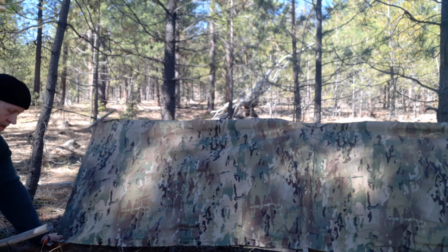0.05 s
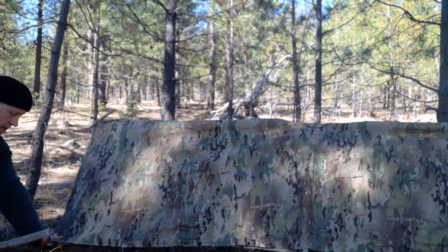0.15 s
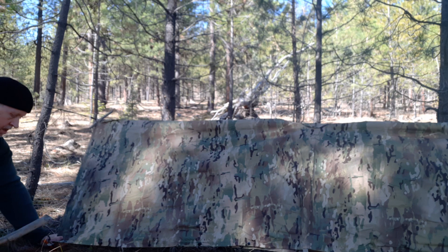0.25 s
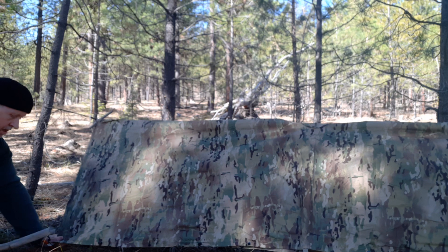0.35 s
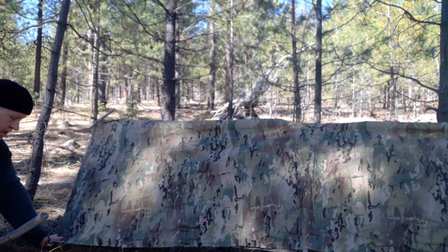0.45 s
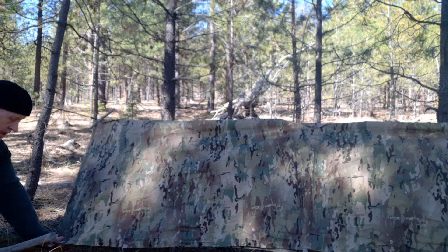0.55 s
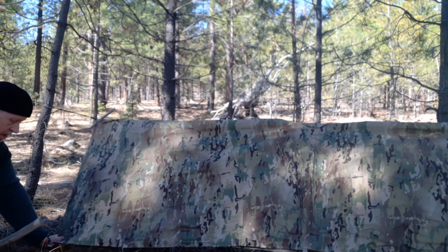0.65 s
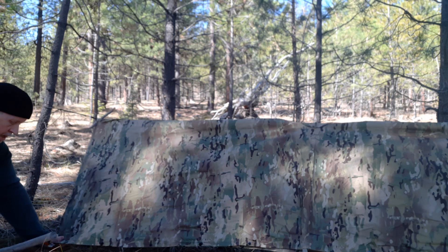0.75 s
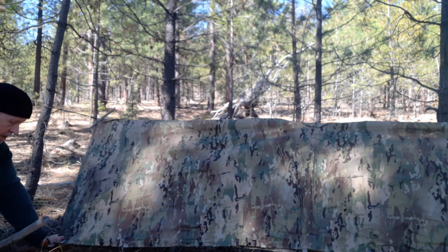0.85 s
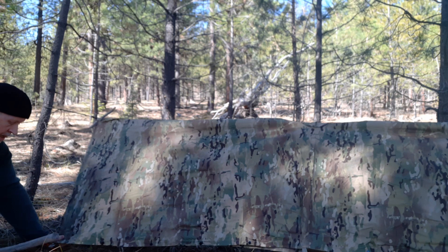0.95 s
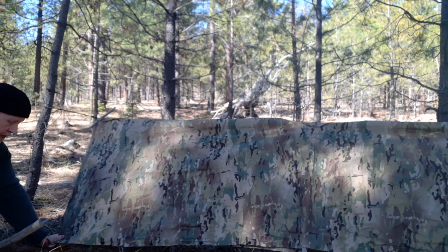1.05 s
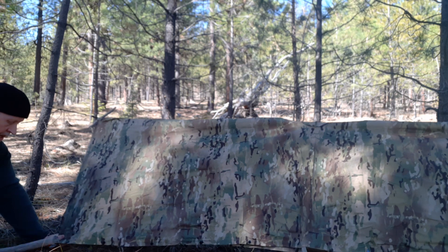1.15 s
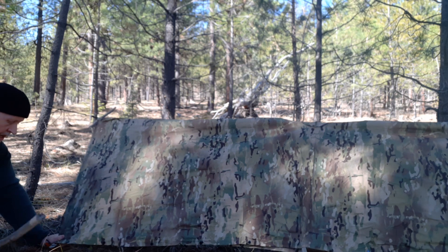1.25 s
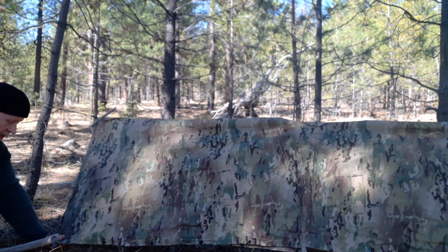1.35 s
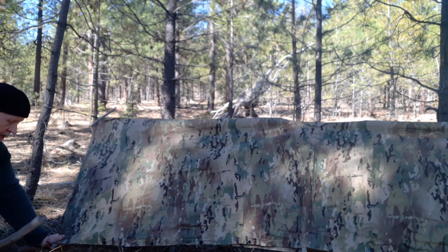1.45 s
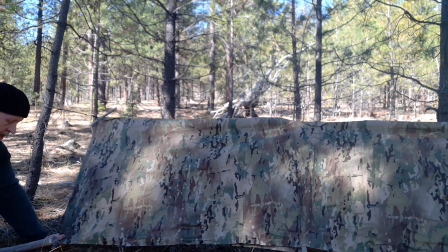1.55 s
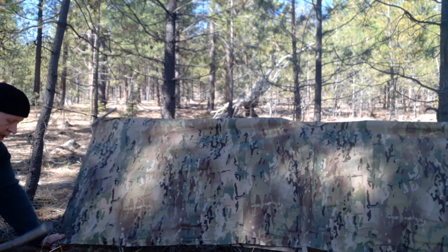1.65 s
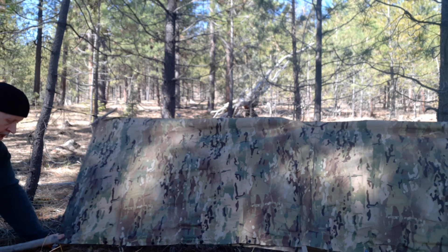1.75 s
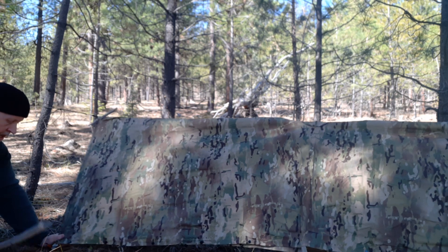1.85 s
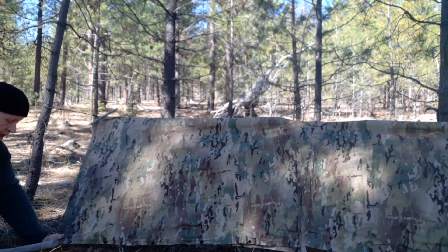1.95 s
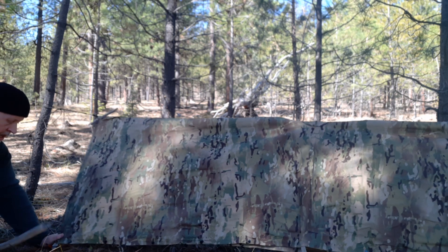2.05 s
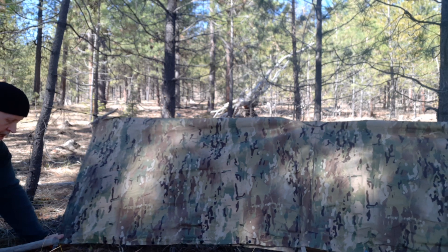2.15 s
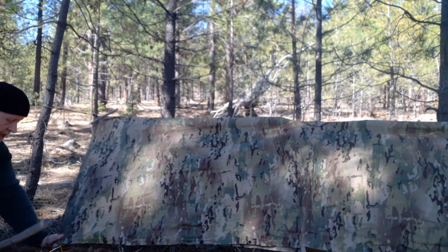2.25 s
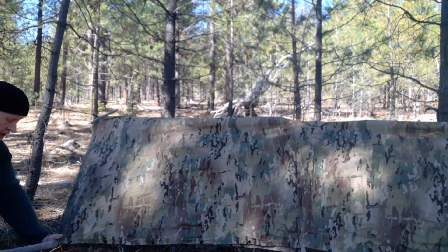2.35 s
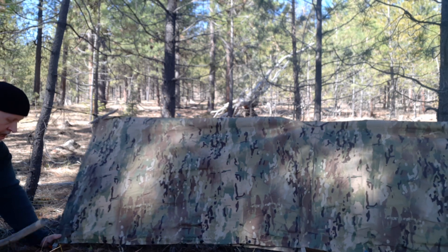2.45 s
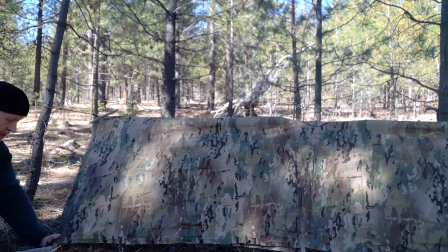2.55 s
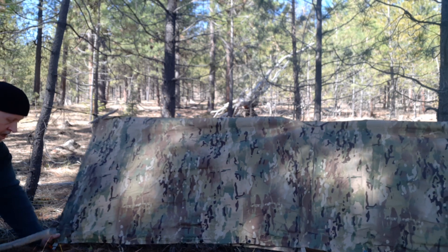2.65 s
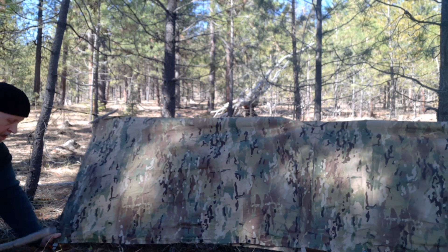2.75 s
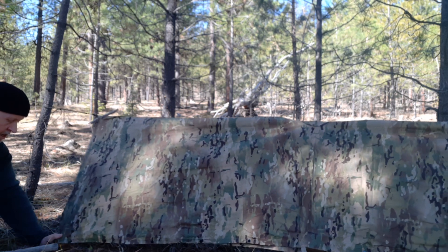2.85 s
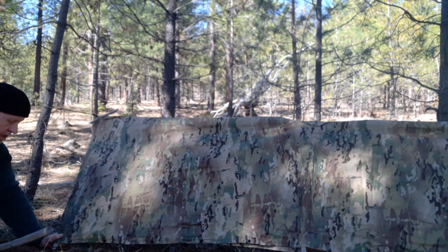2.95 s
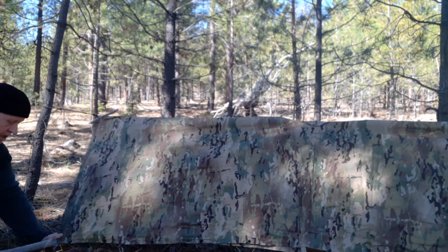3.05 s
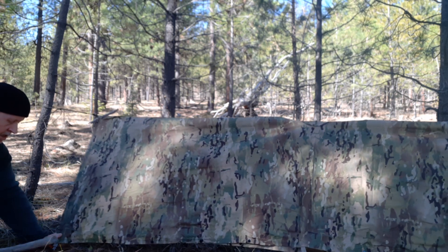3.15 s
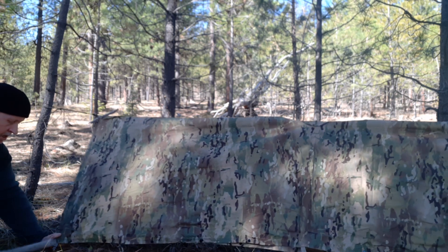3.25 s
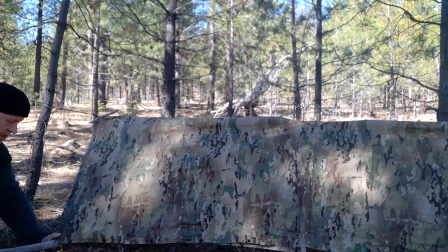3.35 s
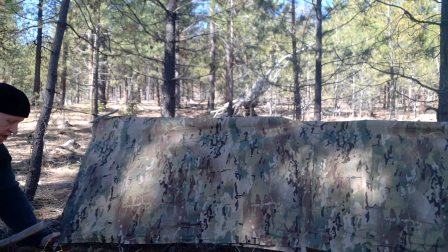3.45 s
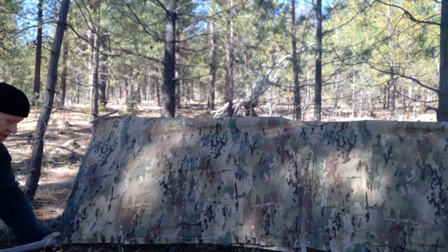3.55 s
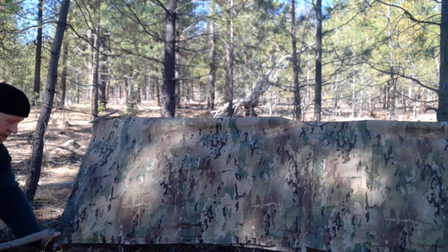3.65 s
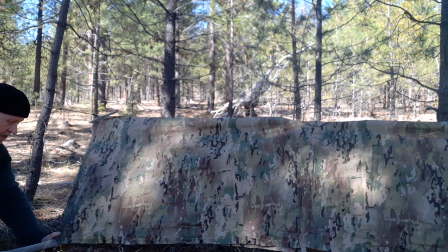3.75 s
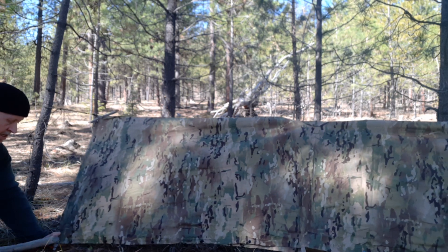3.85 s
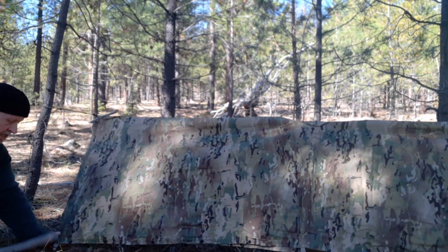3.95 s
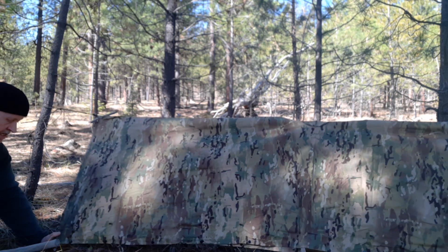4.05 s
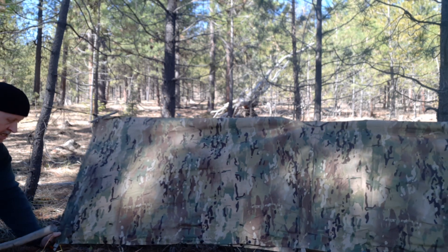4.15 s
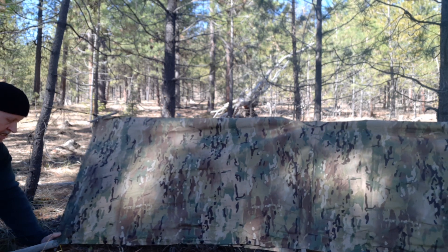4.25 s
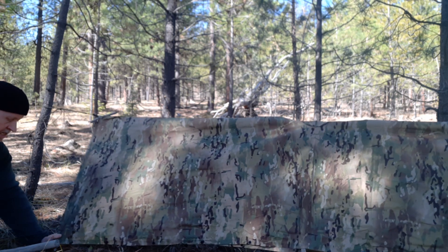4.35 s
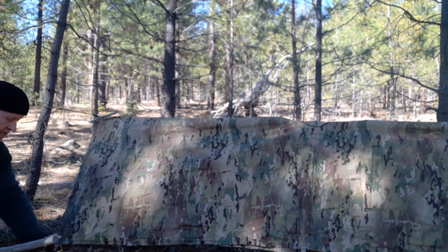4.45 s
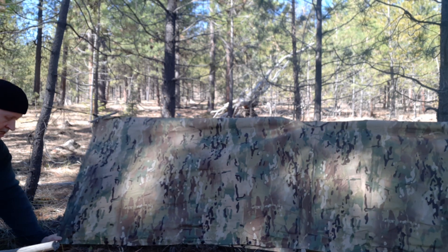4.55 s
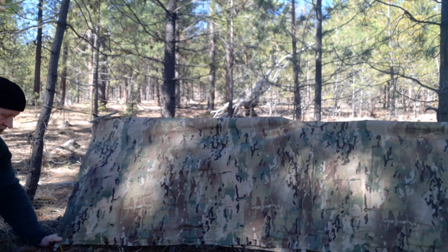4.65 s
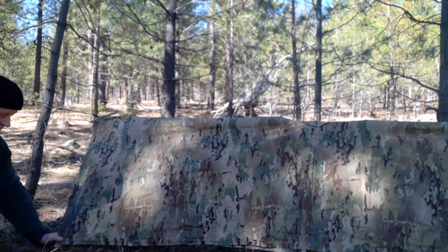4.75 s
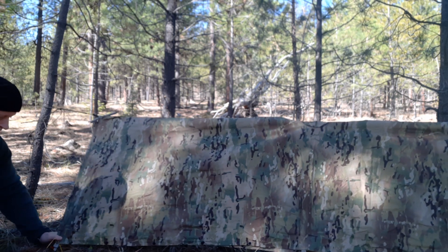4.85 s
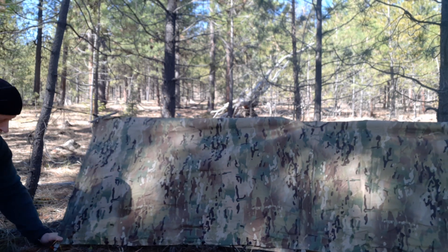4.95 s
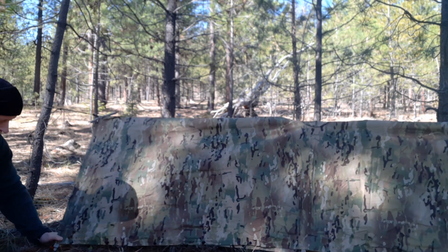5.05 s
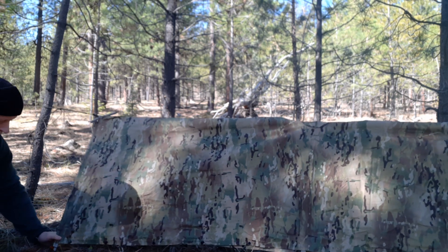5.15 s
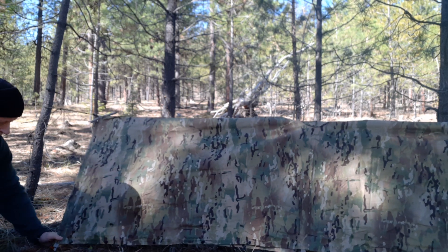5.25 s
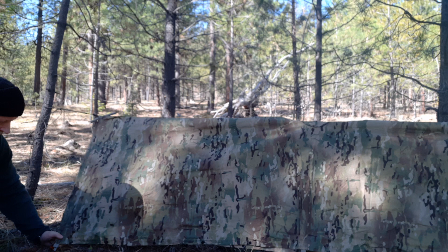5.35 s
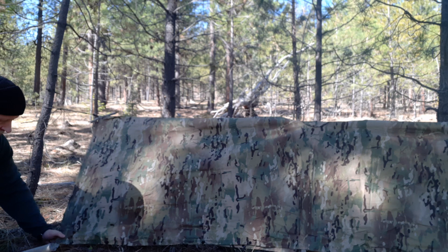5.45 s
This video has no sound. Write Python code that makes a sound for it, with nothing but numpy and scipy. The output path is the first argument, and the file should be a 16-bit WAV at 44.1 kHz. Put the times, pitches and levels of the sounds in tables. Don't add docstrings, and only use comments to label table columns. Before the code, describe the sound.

A wooden club raps a stake about five times a second, falters, resumes slower, then stops, leaving wind rumble and rustling cloth.

```python
import sys
import numpy as np
from scipy import signal
from scipy.fft import rfft, irfft, next_fast_len
from scipy.io import wavfile
from scipy.ndimage import uniform_filter1d, map_coordinates

SR = 44100
rng = np.random.default_rng(int(sys.argv[2]) if len(sys.argv) > 2 else 0)


def wav_out(sig):
    wavfile.write(sys.argv[1], SR, np.round(np.clip(np.atleast_2d(sig).T, -1, 1) * 32767).astype(np.int16))


def gain_from_decibels(decibels):
    exponent = np.asarray(decibels, float) / 20
    return 10 ** exponent


N = 242991


def unit(x):
    return x / np.sqrt(np.mean(x ** 2) + 1e-20)


def along(points, hz):
    f, v = np.transpose(points)
    return np.interp(np.log(hz + 1), np.log(f + 1), v)


def wobble(rate):
    knots = rng.standard_normal(int(N * rate / SR) + 4)
    return map_coordinates(knots, [np.arange(N) * rate / SR])


def filtered(x, response):
    n = x.shape[-1]
    m = next_fast_len(n + 2048)
    return irfft(rfft(x, m) * response(np.fft.rfftfreq(m, 1 / SR)), m)[..., :n]


def nearness(hz, center, width):
    return 1 / (1 + (2 * (hz - center) / width) ** 2)


def ring(x, modes, detune=1):
    c, w, db = np.transpose(modes)[:, :, None]
    each = filtered(x, lambda f: 1j * f * w / ((c * detune) ** 2 - f * f + 1j * f * w))
    signs = (-1) ** np.arange(len(modes))[:, None]
    each *= gain_from_decibels(db) * signs / np.linalg.norm(each, axis=1, keepdims=True)
    total = each.sum(axis=0)
    return total / np.abs(total).max()


def rush(spectrum, patchy_db):
    z = signal.stft(rng.standard_normal((2, N)), nperseg=512)[2]
    field = uniform_filter1d(rng.standard_normal(z.shape[1:]), size=8, axis=0)
    field = uniform_filter1d(field, size=6, axis=1)
    pair = signal.istft(z * gain_from_decibels(patchy_db * unit(field)), nperseg=512)[1][:, :N]
    return unit(filtered(pair, lambda hz: gain_from_decibels(along(spectrum, hz))))


def ports(x, lag_s, alike):
    # (frequency [Hz], level [dB])
    shade = [(60, -1), (200, -3.5), (600, -1.5), (1600, -5.5), (3000, -6.5), (6000, -5.5), (9000, -8.5),
             (15000, -11)]

    def to_left(hz):
        late = np.exp(-2j * np.pi * hz * lag_s)
        echo = 0.077 * np.exp(-2j * np.pi * hz * 0.0006)
        return gain_from_decibels(along(shade, hz) / 2) * late * (alike + echo)

    left = filtered(x, to_left)
    right = filtered(x, lambda hz: gain_from_decibels(-along(shade, hz) / 2))
    return np.array([left, right])


def crack(s, square_db, flex_db, shove_db):
    # (frequency [Hz], width [Hz], level [dB])
    wood = [(670, 180, -3), (907, 630, 0.5), (1350, 300, -0.5), (1564, 190, 0.5), (2017, 140, 1)]
    # (frequency [Hz], width [Hz], level [dB])
    face = [(5290, 710, -2), (6672, 430, -0.5), (7445, 510, -3.5)]
    # (frequency [Hz], width [Hz], level [dB])
    edge = [(2840, 1100, -6.5), (3514, 320, -6), (3814, 850, -6)]
    # (frequency [Hz], width [Hz], level [dB])
    splinter = [(9850, 5000, -4.5), (11630, 980, -2), (12500, 1300, -14)]
    t = np.arange(SR // 12) / SR
    chatter_s = 0.0088
    force = rng.standard_normal((4, len(t))) * gain_from_decibels(4.26 * rng.standard_normal(len(t)))
    force *= (1 - np.exp(-t / 0.00035)) * gain_from_decibels(-60 * t / chatter_s)
    force[:, 6] += [1.3, 5.06, 1.6, 4.1]
    detune = 1 + 0.008 * rng.standard_normal()

    low_hz, low_width, low_db = wood[0]
    low_db = low_db + 0.5 * (s - 2.5)
    bending = [(low_hz, low_width, low_db)] + wood[1:]
    wood_db = 4.5 + flex_db - 1.89 * s
    edge_db = 9 + 0.6 * flex_db - 2.5 * s
    spit_db = 2 + 0.48 * square_db - 0.6 * shove_db - 1.93 * s
    out = gain_from_decibels(4.5 + square_db) * ring(force[0], face, detune)
    out += gain_from_decibels(wood_db) * ring(force[1], bending, detune)
    out += gain_from_decibels(edge_db) * ring(force[2], edge, detune)
    out += gain_from_decibels(spit_db) * ring(force[3], splinter)
    bounce = round(0.0042 * SR)
    out[bounce:] += gain_from_decibels(-14) * out[:-bounce]
    return out


def thump(s, shove_db):
    # (frequency [Hz], width [Hz], level [dB])
    soil = [(100, 18, -1), (150.2, 41, 1.5), (273.3, 58, -3.5)]
    t = np.arange(SR // 12) / SR
    shove = t * np.exp(-t / 0.0015)
    high_hz, high_width, high_db = soil[2]
    packed = (high_hz, high_width, high_db + 1.5 * (s - 2.5))
    return gain_from_decibels(-16 + shove_db) * ring(shove, soil[:2] + [packed], 1 + 0.056 * rng.standard_normal())


def trunks(n, tilt_db, loose):
    # (frequency [Hz], time to fall 60 dB [s])
    fading = [(150, 0.33), (500, 0.21), (1500, 0.15), (5000, 0.25), (9000, 0.27), (15000, 0.29)]
    # (frequency [Hz], level [dB per Hz])
    colour = [(120, -28), (200, -10), (961, -5), (1870, -5), (2600, -7.5), (4970, -8.5), (6090, -12.5),
              (6930, -12), (7740, -9.5), (8650, -19.5), (11400, -16.5), (15300, -19), (16500, -33)]
    # (frequency [Hz], width [Hz], level [dB], fade stretch [x])
    linger = [(1940, 590, 5, 1.45), (5400, 560, 5.5, 1.5)]

    def tone(hz):
        lift_db = sum(loose * db * nearness(hz, c, w) for c, w, db, _ in linger)
        return gain_from_decibels(along(colour, hz) + lift_db + tilt_db * np.log2((hz + 300) / 3000))

    def response(hz):
        alike = 1 / (1 + (hz / 900) ** 2)
        return tone(hz) * np.sqrt([1 - alike, 1 - alike, alike])

    left_right_both = filtered(rng.standard_normal((3, n)), response)
    pair = unit(left_right_both[:2] + left_right_both[2])
    hz, t, z = signal.stft(pair, SR, nperseg=128)
    t60 = along(fading, hz)
    for c, w, _, stretch in linger:
        t60 = t60 * (1 + loose * (stretch - 1) * nearness(hz, c, w))
    tail = signal.istft(z * gain_from_decibels(-60 * t / t60[:, None]), SR, nperseg=128)[1][:, :n]
    onset = 1 - np.exp(-np.arange(n) / SR / 0.00069)
    return tail * onset * gain_from_decibels(np.array([[-1.2], [1.2]]))


def club():
    # (time [s], strength [dB], squareness of the hit [dB], flex of club and stake [dB],
    # shove into the soil [dB])
    blows = [(0.3695, -39.5, 0, -2, -2), (0.5677, -29.5, 3, -1.5, 1), (0.7728, -28, 3, -1, 0.5),
             (0.9719, -27.5, 0, -3, 3), (1.1557, -24, 0.5, -1, 1.5), (1.356, -24, -0.5, -2, -1),
             (1.5510, -24, 1.5, -0.5, -0.5), (1.7341, -22.5, -0.5, -1.5, 0),
             (1.9386, -20.5, 0.5, -1.5, -0.5), (2.14, -22.5, 2.5, -2.5, -1), (2.3447, -19.5, -1, -3, -0.5),
             (2.5744, -29.5, -9, 3.5, 13.5), (2.841, -34.5, -4.5, 2, 17.5), (3.0911, -24, 5, 0.5, 3.5),
             (3.3146, -19.5, 2.5, -4.5, -2.5), (3.5482, -22.5, 1.5, 1.5, 3.5), (3.781, -21, 4.5, -0.5, -2),
             (4.0217, -19, -0.5, -0.5, 0), (4.2746, -19.5, 6, 1, 0.5)]
    # (time [s], strength [dB], squareness [dB], flex [dB], shove [dB])
    rebounds = [
        (0.375, -39.5, 4, -19, 1),
        (1.5553, -29, 0, -10, -16),
        (1.78, -53, -2.5, 8, 15.5),
        (2.1825, -48.5, -4, 12.5, 19.5),
        (2.587, -30.5, 1, 2, 4.5),
        (3.3397, -38.5, 4.5, -8.5, 11),
        (3.7938, -29.5, -10, -7, -2),
    ]
    long = SR // 3
    direct, scatter = np.zeros(N + long), np.zeros((2, N + long))
    for row in sorted(blows + rebounds):
        s, db, square_db, flex_db, shove_db = row
        start = round(s * SR)
        hit = crack(s, square_db, flex_db, shove_db) + thump(s, shove_db)
        direct[start:start + len(hit)] += gain_from_decibels(db) * hit
        tilt_db = 0.2 - 0.47 * s - 0.08 * shove_db
        if row in rebounds:
            tilt_db += 1.5
        tail = trunks(long, tilt_db, loose=np.clip(1.25 - s / 4, 0.3, 1))
        scatter[:, start:start + long] += gain_from_decibels(db - 22.5 + 0.2 * shove_db) * tail
    return ports(direct[:N], lag_s=0.0002106, alike=0.96) + scatter[:, :N]


def thuds():
    # (time [s], peak [dB], frequency [Hz])
    settles = [
        (4.078, -46, 240),
        (2.19, -57, 198),
        (3.1, -53, 990),
    ]
    t = np.arange(SR // 12) / SR
    out = np.zeros(N + len(t))
    for s, db, hz in settles:
        push = t * np.exp(-t * hz * 3.5)
        out[round(s * SR):][:len(t)] += gain_from_decibels(db) * ring(push, [(hz, 0.3 * hz, 0)])
    return ports(out[:N], lag_s=0.00022, alike=0.96)


def wind():
    # (time [s], half length [s], peak [dB], left minus right [dB])
    puffs = [(0.0, 0.049, -47.5, -1.5), (0.21, .04, -50.5, -15), (0.405, 0.024, -54, -13),
             (.62, 0.084, -58, -6), (0.89, 0.062, -41, -28), (1.019, 0.035, -41.5, -6.5),
             (1.165, 0.073, -46, -8), (1.304, 0.075, -50.5, 9), (1.61, 0.074, -50, -13.5),
             (1.784, 0.14, -57.5, -5.5), (1.935, 0.052, -48.5, -6), (2.2, 0.22, -55, 5),
             (2.392, .04, -43.5, -14.5), (2.485, 0.023, -36, 3), (2.605, 0.079, -47, 5),
             (2.731, 0.037, -46, -18.5), (2.897, 0.14, -54.5, 5), (3.098, 0.17, -54, 0),
             (3.386, 0.076, -53, 21), (3.552, 0.082, -54, -2.5), (3.865, .07, -61, 7),
             (4.091, 0.042, -54.5, -8.5), (4.29, 0.081, -56, -7), (4.45, 0.025, -49.5, -29),
             (4.738, 0.064, -49.5, -47), (4.858, 0.048, -42, -49), (5.063, 0.02, -47, -14),
             (5.293, .07, -48.5, -33), (5.48, 0.067, -54, -6)]
    # (frequency [Hz], level [dB per Hz])
    buffet = [(12, -41), (20, -18.5), (42, -1.5), (65, 0.5), (103, -12), (198, -39.5), (258, -37.5),
              (307, -39), (400, -57), (520, -69.5), (880, -120)]
    # (frequency [Hz], level [dB per Hz])
    gust_top = [(40, -43.5), (90, -2.5), (130, 1), (200, -16), (320, -36), (600, -55)]
    t = np.arange(N) / SR
    power = np.full((2, N), gain_from_decibels(-75.5) ** 2)
    for s, half_s, db, lean_db in puffs:
        share = gain_from_decibels(np.array([lean_db, -lean_db]))
        share = 2 * share / share.mean()
        power += gain_from_decibels(db) ** 2 * share[:, None] * np.exp(-((t - s) / half_s) ** 2)
    level_db = 10 * np.log10(power.mean(axis=0) / 2)
    lean_db = 10 * np.log10(power[0] / power[1])
    lumps = gain_from_decibels(2.9 * np.array([wobble(25), wobble(25)]))
    flutter_db = -10 + np.minimum(level_db, -46) + 44 - 0.39 * np.abs(lean_db)
    flutter = gain_from_decibels(flutter_db) * rush(gust_top, patchy_db=-0.5)
    eddies = rush(buffet, patchy_db=1.26)
    eddies /= np.abs(uniform_filter1d(eddies ** 2, size=SR // 16) + 0.055) ** 0.2
    pressed = np.sqrt(power) * lumps * (unit(eddies) + flutter)
    return filtered(pressed, lambda hz: hz ** 2 / (hz ** 2 + 38 ** 2))


def cloth():
    # (time [s], level [dB])
    fidgets = [(0.0, -75), (0.3, -79.5), (0.6, -72.5), (1.2, -75.5), (1.52, -80.5), (1.81, -72.5),
               (2.3, -85.5), (2.6, -78.5), (3.0, -84.5), (3.5, -79), (4.3, -83.5), (4.64, -74), (4.79, -70),
               (4.93, -77), (5.22, -73), (5.51, -75.5)]
    # (frequency [Hz], level [dB per Hz])
    swish_tone = [(1180, -48), (2000, -17.5), (2330, -37.5), (2740, -21.5), (4000, -8.5), (7550, -4),
                  (9000, -17), (11700, -42.5), (19800, -120)]
    # (frequency [Hz], level [dB per Hz])
    crinkle_tone = [(5290, -35), (9000, -6), (15100, 2), (16200, -17.5), (16300, -19.5), (16500, -49.5)]
    # (frequency [Hz], level [dB per Hz])
    scuff_tone = [(200, -30), (450, -2.5), (900, -2.5), (1300, -12.5), (2500, -18.5), (4000, -41)]
    # (time [s], half length [ms], swish [dB], crinkle [dB], scuff [dB])
    arm_sweeps = [
        (.62, 82, -76, -98, -67.5),
        (1.522, 22, -78, -73.5, -92.5),
        (3.491, 31, -58, -69, -59.5),
        (3.724, 26, -68.5, -82.5, -72),
        (4.21, 55, -80, -87.5, -91.5),
        (4.731, 59, -67, -64.5, -90),
        (4.9, 67, -81.5, -74.5, -94),
        (5.44, 48, -73, -67.5, -87.5),
        (5.481, 5.3, -65, -58, -82),
    ]
    t = np.arange(N) / SR
    fidget_db = np.interp(t, *np.transpose(fidgets))
    sweeps = np.zeros((3, N))
    for s, half_ms, *db in arm_sweeps:
        sweeps += gain_from_decibels(np.array(db))[:, None] * np.exp(-((t - s) / half_ms * 1000) ** 2)
    grain = gain_from_decibels(1.7 * wobble(57) + 1.8 * wobble(330))
    swish_db = -83 + 0.69 * (fidget_db - fidget_db.mean())
    swish = (gain_from_decibels(swish_db) / grain ** 0.66 + sweeps[0]) * rush(swish_tone, patchy_db=1.0)
    crinkle = (gain_from_decibels(fidget_db) / grain ** 0.7 + sweeps[1]) * rush(crinkle_tone, patchy_db=1.3)
    scuff = sweeps[2] * rush(scuff_tone, patchy_db=3)
    return gain_from_decibels(np.array([[-2.5], [2.5]])) * grain * (swish + crinkle + scuff)


def needles():
    # (time [s], top peak [dB], body [dB])
    ticks = [(0.038, -58, -2), (0.086, -51.5, -6), (.2135, -64, -7), (0.505, -63, -1), (0.523, -52, -8),
             (.893, -59, -3), (1.294, -54, -9), (1.533, -61, -2), (2.61, -52, -9), (2.619, -45, -6),
             (2.636, -48, -7), (2.664, -56, 3), (2.686, -66, 3), (2.872, -47.5, -8), (3.463, -59, 6),
             (3.562, -35.5, 3.5), (3.582, -43, -5), (4.681, -56, 4), (4.703, -60, -7), (4.731, -45, -4),
             (4.921, -57.5, 3), (5.091, -53, -17), (5.148, -59, -10), (5.217, -56.5, -7),
             (5.272, -56.5, -8), (5.374, -54, -1), (5.426, -56, -2), (5.471, -46, -4), (5.478, -54, 1),
             (5.484, -49.5, 0)]
    # (frequency [Hz], width [Hz], level [dB])
    snap_body = [(4460, 1500, -4), (6500, 2000, 0)]
    # (frequency [Hz], width [Hz], level [dB])
    snap_top = [(11370, 2300, 1.5), (14250, 4000, 3.5)]
    t = np.arange(SR // 50) / SR
    out = np.zeros(N + len(t))
    for s, db, body_db in ticks:
        snap = rng.standard_normal((2, len(t))) * gain_from_decibels(-60 * t / 0.007)
        tick = gain_from_decibels(body_db) * ring(snap[0], snap_body) + ring(snap[1], snap_top)
        out[round(s * SR):][:len(t)] += gain_from_decibels(db + 0.5) * tick
    return ports(out[:N], lag_s=0.00018, alike=0.7)


def squeaks():
    # (time [s], peak [dB], frequency [Hz], length [ms])
    rubs = [(.63, -48, 3680, 11), (.90, -58, 3400, 28), (.917, -59, 3650, 51), (1.121, -64.5, 3700, 39),
            (1.307, -53.5, 3500, 45), (1.491, -58.5, 3500, 18), (1.514, -56, 3500, 24),
            (1.705, -56.5, 3700, 29)]
    t = np.arange(SR // 10) / SR
    out = np.zeros(N + len(t))
    for s, db, hz, length_ms in rubs:
        u = t / (length_ms / 4000 + 1e-4)
        rub = rng.standard_normal(len(t)) * u * np.exp(-u)
        out[round(s * SR):][:len(t)] += gain_from_decibels(db - 3.5) * ring(rub, [(hz, 400, 0)])
    return ports(out[:N], lag_s=0.00018, alike=0.7)


def canopy():
    # (frequency [Hz], level [dB per Hz])
    hush = [(88, -32.5), (150, -2), (209, -14.5), (546, -7), (883, -15), (1530, -16.5), (1880, -20),
            (4000, -22), (5200, -56), (8800, -120)]
    return gain_from_decibels(-78.5) * gain_from_decibels(np.array([[-1.5], [1.5]])) * rush(hush, patchy_db=3.0)


def scene():
    return club() + thuds() + wind() + cloth() + needles() + squeaks() + canopy()


def roll_off(x):
    return signal.sosfilt(signal.butter(12, 17080, fs=SR, output="sos"), x)


def record(dry):
    # (frequency [Hz], width [Hz], depth [0-1])
    cavity = [(8500, 500, 1), (9165, 1300, 0.55), (9970, 970, 0.4)]

    def response(hz):
        gain = gain_from_decibels(-0.04 * np.clip(hz - 15850, 0, None))
        for c, w, depth in cavity:
            gain = gain * (1 - np.clip(depth, 0, 0.95) * 1j * hz * w / (c * c - hz * hz + 1j * hz * w))
        return gain

    return roll_off(filtered(dry, response))


dry = scene()
out = record(dry)
wav_out(out)
```